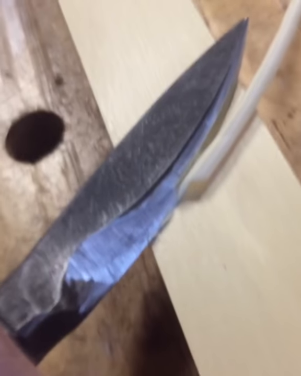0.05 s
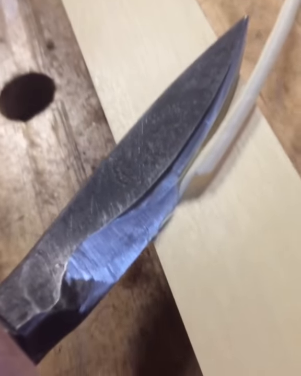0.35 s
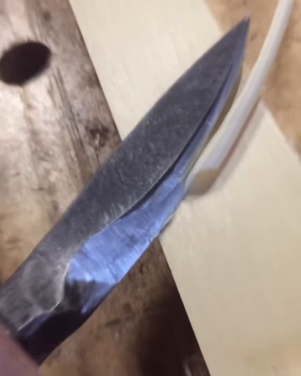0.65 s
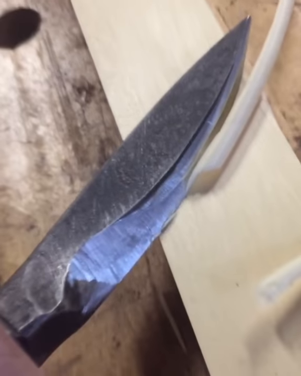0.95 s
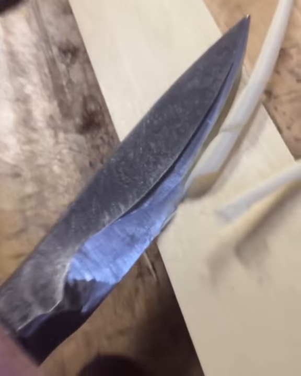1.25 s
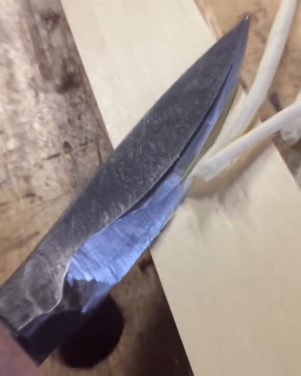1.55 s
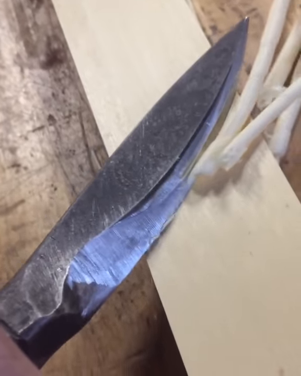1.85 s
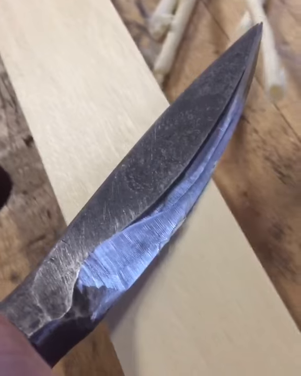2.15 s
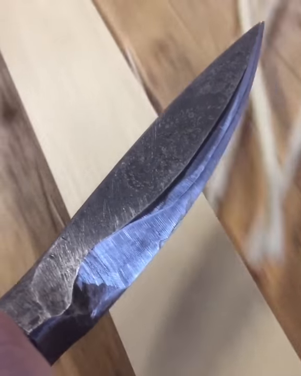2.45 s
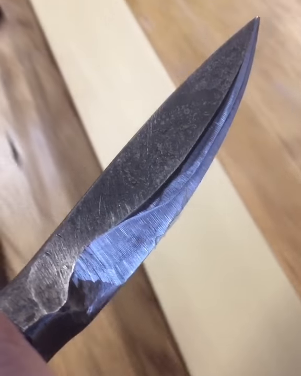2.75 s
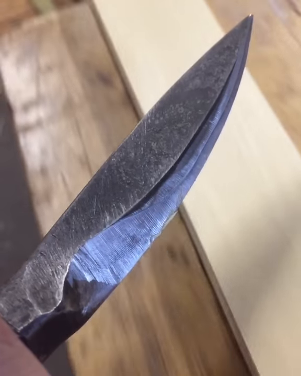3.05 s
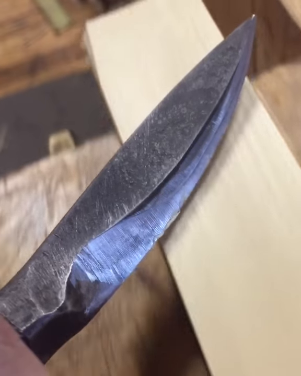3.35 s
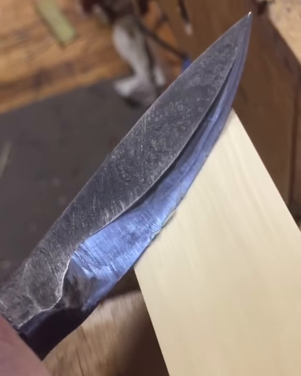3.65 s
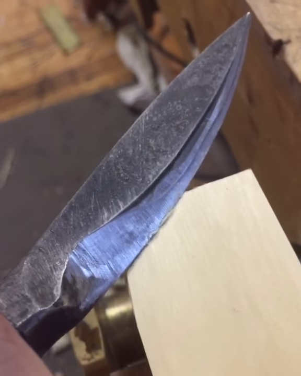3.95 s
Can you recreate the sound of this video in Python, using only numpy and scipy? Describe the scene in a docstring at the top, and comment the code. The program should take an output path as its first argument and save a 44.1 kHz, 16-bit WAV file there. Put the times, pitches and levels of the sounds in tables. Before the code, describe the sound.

From the start a knife slices along a soft wooden board, close up, with a low judder, a hissing scrape and tiny splinter snaps that thicken around 1.5 seconds. At 2 seconds the blade rasps out of the cut. The board is moved with quiet rubbing, soft bumps and two light ticks. At 3.5 seconds it knocks once on the workbench and drags briefly, in a small room.

```python
"""A knife slices one long shaving off a soft board on a workbench, close to the microphone.
From the start the slipping blade judders, parting fibres hiss and ring board and blade, splinters snap.
At two seconds the edge rasps out of the cut. The board is then moved, with friction noise, soft bumps
and two light ticks, and at three and a half seconds it knocks once on the bench in a small room."""
import sys
import numpy as np
from scipy import signal
from scipy.fft import rfft, irfft, next_fast_len
from scipy.io import wavfile
from scipy.ndimage import uniform_filter1d, map_coordinates

SR = 44100
rng = np.random.default_rng(int(sys.argv[2]) if len(sys.argv) > 2 else 0)


def file_out(sig):
    """Save sig as 16-bit WAV at sys.argv[1]."""
    # one column per channel
    cols = np.atleast_2d(sig).T
    # limit, then scale
    lim = np.clip(cols, -1, 1)
    pcm = np.round(lim * 32767).astype(np.int16)
    wavfile.write(sys.argv[1], SR, pcm)


N = 176400

# Course of the stroke. Each row: time in seconds, relative levels in dB of board, blade and hiss.
STROKE = [(0, -62, -76, -60), (.25, -57.5, -76, -58.5), (.33, -62.5, -81, -65), (.45, -56, -92, -61),
          (.7, -61, -91, -66.5), (.88, -51.5, -66.5, -58.5), (1.1, -57, -66.5, -62),
          (1.25, -53, -62, -56.5), (1.38, -49, -59.5, -55.5), (1.48, -47, -57.5, -58.5),
          (1.59, -49, -57, -54), (1.65, -54, -67, -59.5), (1.78, -56, -67, -63.5),
          (1.86, -53.5, -66, -59.5), (1.94, -59.5, -73, -62.5), (2.0, -49, -60, -56.5),
          (2.09, -50, -64, -62), (2.15, -69, -74, -75)]
# Its low sounds. Each row: time in seconds, relative level in dB.
JUDDER_LEVELS = [(0.0, -29), (0.02, -42), (0.66, -45.5), (0.69, -56), (0.74, -44.5), (0.93, -39),
                 (1.09, -48.5), (1.2, -39.5), (1.25, -52), (1.28, -40.5), (1.33, -51), (1.36, -40),
                 (1.53, -41.5), (1.79, -55), (1.96, -43.5), (2.08, -50), (2.11, -46), (2.17, -87)]
RUMBLE_LEVELS = [(0, -46.5), (.22, -51), (.32, -52.5), (.6, -47.5), (.95, -47.5), (1.1, -89), (1.6, -68.5),
                 (1.85, -56), (2.05, -48), (2.15, -70)]
# Driven resonances. Each row: frequency in Hz, bandwidth in Hz, relative level in dB.
JUDDER_MODES = [(97.5, 21, 1.5), (220.5, 38.4, -4), (304.3, 46.6, -15.5)]
BOARD_MODES = [(604.5, 38, -1.5), (657.6, 48, -0.5), (890, 70, -8), (1102.4, 37, 1.5)]
BLADE_MODES = [(3197, 164, 3.5), (3367, 230, -3.5), (4980, 230, -9)]
GRAIN_MODES = [(604, 31, -2.5), (1460, 127, -5), (1595, 59, -6), (2150, 146, -6.5), (2710, 150, -11.5)]
EDGE_MODES = [(4400, 300, -7.5), (5110, 200, -4), (6370, 350, 0.5), (9740, 510, 1)]
RASP_MODES = [(1117, 67, -3), (1680, 110, -11), (3390, 92, -10)]
DRAG_MODES = [(1580, 430, 10), (1970, 430, -3), (3030, 1200, -11)]
# Spectral envelopes. Each row: frequency in Hz, relative level in dB.
HISS_SPECTRUM = [(400, -13), (1300, -35), (2600, -11), (4400, -4.5), (5800, -10.5), (7000, -5),
                 (7700, -11.5), (8600, -0.5), (10000, -8), (10900, -5.5), (11500, -0.5), (14300, -1),
                 (15300, -5.5)]
RUMBLE_SPECTRUM = [(20, -11), (42, -8), (62, -12), (85, -4.5), (200, -46.5)]
AMBIENT_SPECTRUM = [(25, -5), (60, -11.5), (120, -1), (150, -14.5), (192, 3), (250, -10.5), (335, -5),
                    (400, -19.5), (455, -12.5), (790, -19.5), (1250, -16.5), (1800, -21), (6000, -27.5),
                    (15000, -33)]
TEAR_SPECTRUM = [(5000, -35), (9000, -12), (13000, -2), (15000, -7)]
RASP_SPECTRUM = [(150, -20), (350, 3), (700, -1), (1400, -4), (2000, -12), (2500, 0.5), (7000, -5),
                 (12000, 2), (15000, -9.5)]
BRUSH_SPECTRUM = [(1500, -11), (5000, -6.5), (8500, 0.5), (12000, -2), (15000, -1.5)]
SLIDE_SPECTRUM = [(120, -21), (234, -5.5), (441, -4.5), (742, -14.5), (1270, -7), (1910, -20.5),
                  (3090, -19), (4100, -17.5), (5510, -33), (15000, -28.5)]
CLACK_SPECTRUM = [(100, -28), (450, -16.5), (800, 0), (1400, 2), (1900, -5.5), (2350, -27), (3300, -16),
                  (4500, -29), (6000, -21), (8000, -27), (15000, -46)]
# Brief transients. Each row: start in seconds, level in dB, centre frequency in Hz.
SNAPS_AND_TICKS = [(.044, -36.5, 12100), (0.0781, -28.5, 4900), (.203, -35, 11500), (.7235, -43, 12600),
                   (1.3738, -29.5, 13000), (1.534, -30.5, 13200), (1.539, -33, 8900), (1.543, -34.5, 4000),
                   (1.579, -32, 13200), (1.587, -36, 14100), (1.6049, -35.5, 10100), (1.683, -39, 12300),
                   (1.697, -38, 10400), (1.703, -36, 9800), (1.724, -49, 12200), (1.911, -39, 12100),
                   (2.034, -32, 12000), (3.074, -49.5, 2620), (3.173, -48.5, 1690)]  # the last two rows are ticks of the moved board
CATCHES = [(.205, -28.5, 57), (0.214, -38.5, 254), (1.276, -38.5, 208), (1.436, -35, 207),
           (1.906, -47, 203), (2.104, -37, 168)]
# Jolts of the board. Each row: start in seconds, level in dB, centre in Hz, 60 dB decay time in seconds.
BUMPS = [(1.543, -38, 1700, .03), (2.26, -47, 290, 0.11), (3.172, -39, 800, 0.055), (3.175, -48, 350, 0.19),
         (3.24, -52, 940, 0.23), (3.399, -44.5, 910, 0.034), (3.465, -46.5, 645, 0.053),
         (3.467, -39, 293, 0.083), (3.496, -34.5, 1140, 0.01), (3.932, -51, 684, 0.047),
         (3.934, -36.5, 208, 0.061)]
# Tearing and rubbing. Each row: start, attack, hold and release in seconds, level in dB.
TEAR_SWELL = (1.44, -0.08, 0.39, 0.16, -56.5)  # the negative attack gives an abrupt onset
RASP_SWELL = (2.002, .025, .035, .085)  # times only
BRUSH_SWELLS = [(2.071, 0.039, 0.009, 0.022, -53), (2.1, 0.022, 0.021, 0.13, -58.5),
                (2.122, .03, 0.11, 0.53, -69), (3.482, 0.019, .2, 0.32, -71.5),
                (3.73, 0.023, 0.0046, .015, -72)]
SLIDE_SWELLS = [(2.115, 0.029, 0.4, 0.12, -63.5), (3.015, 0.12, 0.17, 0.54, -65)]
DRAG_SWELL = (3.5, 0.1, 0.67, -0.55, -66)  # the negative release cuts the hold short
# Contacts of the knock. Each row: start in seconds, level in dB, cutoff in Hz, relative thump in dB.
CONTACTS = [(3.5079, -12, 3120, -17.5), (3.5116, -16, 1540, -3.5), (3.5131, -29, 4940, 3.5),
            (3.5188, -28, 800, -0.5)]
# Free vibrations. Each row: frequency in Hz, relative level in dB, 60 dB decay time in seconds.
STRUCK_MODES = [(634, -18, 0.078), (681, -18.5, 0.16), (800, -33, 0.045), (1086, -21.5, 0.061),
                (1480, -17.5, 0.04), (1953, -28, 0.065), (2900, -31, 0.034), (3285, -27.5, 0.02)]
BENCH_MODES = [(92, -6, 0.048), (174, -19, 0.13), (250, -5, 0.036)]
# Decay of the room. Each row: frequency in Hz, reverberation time in seconds.
ROOM_T60 = [(100, 0.41), (500, 0.41), (1600, 0.17), (4000, 0.24), (12000, 0.21)]

RISE_PER_S, SAG_PER_S, MID_CUT_S = .035, .07, 1.25  # fractional pitch drift, about mid-stroke
FIBRES_PER_S, SLIPS_PER_S, CRACKLES_PER_S, CLUMPS_PER_S = 9000, 500, 1000, 90
JUDDER_GROWS_DB_PER_S, RING_GROWS_DB_PER_S, GRAIN_FADE_DB_PER_S = 5.5, 4.5, 6
GRIP_DB = 1.3  # level swing as the edge's grip varies


def amp(db):
    """Amplitude ratio of a level in decibels."""
    return 10 ** (np.asarray(db) / 20)


def unit(x):
    """Normalisation to rms 1."""
    return x / np.sqrt(np.mean(x ** 2) + 1e-20)


def clock():
    """Sample times in seconds."""
    return np.arange(N) / SR


def along(points, hz):
    """Interpolation on a logarithmic frequency axis."""
    f, values = np.transpose(points)
    return np.interp(np.log(hz + 1), np.log(f + 1), values)


def levels(rows):
    """One envelope per dB column, decaying exponentially after the last row."""
    times, *columns = np.transpose(rows)
    fade_db = 69 * np.maximum(clock() - times[-1], 0)
    return [amp(np.interp(clock(), times, db) - fade_db) for db in columns]


def swell(start, attack, hold, release, db):
    """A trapezoidal amplitude envelope."""
    return amp(db) * np.interp(clock(), start + np.cumsum([0, attack, hold, release]), [0, 1, 1, 0])


def wobble(per_s):
    """Smooth random modulation."""
    return map_coordinates(rng.standard_normal(int(N * per_s / SR) + 4), [clock() * per_s])


def filtered(x, response):
    """Linear filtering: the spectrum times a frequency response."""
    size = next_fast_len(len(x) + SR // 4)
    return irfft(rfft(x, size) * response(np.fft.rfftfreq(size, 1 / SR)), size)[:len(x)]


def coloured(x, spectrum):
    """Spectral shaping, at rms 1."""
    return unit(filtered(x, lambda f: amp(along(spectrum, f))))


def ring(x, modes, drift=0):
    """Forced resonance at rms 1; resampling makes the pitch drift."""
    def band(f, hz, width):
        return 1j * f * width / (hz * hz - f * f + 1j * f * width)
    y = filtered(x, lambda f: sum(amp(db) * band(f, hz, w) * band(f, hz, 4 * w) for hz, w, db in modes))
    speed = 1 + drift * (clock() - MID_CUT_S)
    return unit(map_coordinates(y, [np.cumsum(speed)], mode="wrap"))


def minimum_phase(gain):
    """The most compact causal impulse response with this gain."""
    cepstrum = irfft(np.log(np.maximum(gain, 1e-6)))
    cepstrum[1:len(cepstrum) // 2] *= 2
    cepstrum[len(cepstrum) // 2 + 1:] = 0
    return irfft(np.exp(rfft(cepstrum)))


def burst(hz, octaves, t60):
    """An exponentially damped band of noise."""
    t = np.arange(SR // 6) / SR
    white = rng.standard_normal(len(t))
    noise = filtered(white, lambda f: 1 / (1 + np.abs(np.log2((f + 1) / hz) / octaves) ** 3))
    decay = amp(-60 * t / t60)
    return unit(noise * decay) * np.sqrt(np.mean(decay ** 2)) / 2


def add(track, start, x):
    """Superposition of x from a start in seconds."""
    i = int(start * SR)
    track[i:i + len(x)] += x[:N - i]


def fractures(spread_db, per_s=FIBRES_PER_S):
    """Independent tiny breaks form a Poisson train of impulses with log-normal sizes."""
    impulses = (rng.random(N) < per_s / SR) * rng.choice([-1, 1], N)
    return unit(impulses * amp(spread_db * rng.standard_normal(N)))


def crackle():
    """Fibres give way in clumps, modulating an impulse train in amplitude."""
    return unit(fractures(0, CRACKLES_PER_S) * amp(4 * wobble(CLUMPS_PER_S)))


def woody(x, t60=.028):
    """The board's dense high modes overlap, so their impulse response is decaying noise."""
    t = np.arange(SR // 30) / SR
    modes = rng.standard_normal(len(t)) * amp(-60 * t / t60)
    return unit(unit(x) + amp(2.5) * unit(signal.fftconvolve(x, modes)[:N]))


def patchy(x, depth_db=1.5):
    """Uneven grain modulates the spectrum in time and frequency."""
    spectra = signal.stft(x, nperseg=512)[2]
    field = uniform_filter1d(rng.standard_normal(spectra.shape), size=5, axis=0)
    field = uniform_filter1d(field, size=24, axis=1)
    return unit(signal.istft(spectra * amp(depth_db * unit(field)), nperseg=512)[1][:N])


def judder(grip):
    """Stick-slip of the edge drives low resonances; the upper ones gain along the stroke."""
    force, = levels(JUDDER_LEVELS)
    slips = fractures(1.5, SLIPS_PER_S)
    share = amp(JUDDER_MODES[1][2] + JUDDER_GROWS_DB_PER_S * (clock() - MID_CUT_S))
    shaking = ring(slips, JUDDER_MODES[:1], RISE_PER_S) + share * ring(slips, JUDDER_MODES[1:])
    return force * amp(-1 + GRIP_DB * grip) * shaking / np.hypot(1, share)


def board_ring(push, grip):
    """Parting fibres force the board's modes; the highest rises and takes a growing share of power."""
    body = ring(fractures(spread_db=9), BOARD_MODES[:-1])
    stutter = amp(2 * wobble(70))
    tone = unit(stutter * ring(fractures(spread_db=5.5), BOARD_MODES[-1:], RISE_PER_S))
    share = amp(BOARD_MODES[-1][2] + RING_GROWS_DB_PER_S * (clock() - MID_CUT_S))
    return push * amp(-4 + GRIP_DB * grip) * (body + share * tone) / np.hypot(1, share)


def blade_ring(bite, grip):
    """Fractures force the blade's high resonances, which rise slightly."""
    breaks = woody(fractures(spread_db=5.5))
    return bite * amp(-1.5 + GRIP_DB * grip) * ring(breaks, BLADE_MODES, .6 * RISE_PER_S)


def grain_scrape(push, grip):
    """Scraping excites sagging resonances of the grain and steady ones of the thin edge."""
    t = clock()
    scrape = fractures(spread_db=7) + crackle()
    ringing = ring(scrape, GRAIN_MODES, -SAG_PER_S) + amp(-3.5) * ring(scrape, EDGE_MODES)
    envelope = (t < STROKE[-1][0]) * (push / push.max()) ** .29  # loosely follows the board
    return envelope * amp(-58 + GRIP_DB * grip - GRAIN_FADE_DB_PER_S * t) * patchy(ringing)


def fibre_hiss(parting, grip):
    """Thousands of fractures a second merge into broadband shot noise."""
    breaks = amp(1.5 * wobble(250)) * woody(fractures(spread_db=2)) + amp(-3) * crackle()
    flicker_db = grip + 1.2 * wobble(45.46)
    return parting * amp(-1 + flicker_db) * patchy(coloured(breaks, HISS_SPECTRUM))


def rumble():
    """Low-frequency noise swells and fades with the stroke."""
    envelope, = levels(RUMBLE_LEVELS)
    return envelope * amp(-4) * coloured(rng.standard_normal(N), RUMBLE_SPECTRUM)


def ambience():
    """Stationary noise forms the room's quiet background."""
    return amp(-65) * coloured(rng.standard_normal(N), AMBIENT_SPECTRUM)


def snaps_and_ticks(t60=.0084, width_hz=5400, scatter_s=.0078):
    """Splinters snap by brittle fracture during the cut; later the moved board gives two light ticks."""
    out = np.zeros(N)
    for start, db, hz in SNAPS_AND_TICKS:
        octaves = min(.65, width_hz / hz)
        add(out, start, amp(db) * burst(hz, octaves, t60))
        for lag in rng.uniform(-scatter_s, scatter_s, size=2):  # two weaker bursts close by
            add(out, start + lag, amp(db - 10.5) * burst(hz, octaves, t60))
    return out


def reverberation(x):
    """Diffuse reflections arrive after 5 ms and decay at a rate set by frequency."""
    hz, t, spectra = signal.stft(rng.standard_normal(SR // 2), SR, nperseg=256)
    decay = amp(-60 * t / along(ROOM_T60, hz)[:, None])
    tail = signal.istft(spectra * decay, SR, nperseg=256)[1]
    return signal.fftconvolve(x, np.pad(tail, (SR // 200, 0)) / np.linalg.norm(tail))[:N]


def thuds(rows, attack_s=.00099):
    """A jolt gives the board a damped response that builds quickly and dies away."""
    out = np.zeros(N)
    for start, db, hz, t60 in rows:
        jolt = burst(hz, octaves=.38, t60=t60)
        onset = 1 - np.exp(-np.arange(len(jolt)) / SR / attack_s)
        add(out, start, amp(db) * jolt * onset)
    return out


def catches(t60=.091):
    """The edge catches in the grain, exciting low transients."""
    return thuds([(*row, t60) for row in CATCHES])


def tear():
    """The shaving tears in clumps of impulses, strongest in the high treble."""
    return swell(*TEAR_SWELL) * coloured(crackle(), TEAR_SPECTRUM)


def rasp():
    """As the edge leaves the cut, one train of fractures drives both noise and resonances."""
    breaks = fractures(spread_db=6)
    noise = swell(*RASP_SWELL, db=-48) * coloured(woody(breaks), RASP_SPECTRUM)
    return noise + swell(*RASP_SWELL, db=-54) * ring(breaks, RASP_MODES)


def brushing():
    """Light friction of shaving and hand on the wood gives bright noise."""
    envelope = sum(swell(*row) for row in BRUSH_SWELLS)
    return envelope * coloured(woody(fractures(spread_db=5.5)), BRUSH_SPECTRUM)


def sliding():
    """Sliding friction of the board gives dull, uneven noise."""
    envelope = sum(swell(*row) for row in SLIDE_SWELLS) * amp(wobble(24.66))
    return envelope * coloured(woody(fractures(spread_db=4.5)), SLIDE_SPECTRUM)


def drag():
    """Friction drives broad resonances as the board is briefly drawn along."""
    envelope = swell(*DRAG_SWELL) * amp(2.9 * wobble(25.25))
    return envelope * ring(woody(rng.standard_normal(N)), DRAG_MODES)


def knock():
    """Each contact clacks and sets board and bench in free vibration; softer contact is duller."""
    out, t = np.zeros(N), np.arange(SR // 2) / SR
    f = np.fft.rfftfreq(len(t), 1 / SR)
    clack = minimum_phase(amp(along(CLACK_SPECTRUM, f)))
    clack /= np.abs(clack).max()
    onset = 1 - np.exp(-t / .001)

    def vibration(modes):
        return sum(amp(db + rng.normal(0, 1) - 60 * t / t60) * np.sin(2 * np.pi * hz * t)
                   for hz, db, t60 in modes)
    for start, db, cutoff_hz, thump_db in CONTACTS:
        blow = clack + vibration(STRUCK_MODES) + amp(thump_db) * vibration(BENCH_MODES) * onset
        lowpass = minimum_phase(1 / np.hypot(1, (f / cutoff_hz) ** 2))
        add(out, start, amp(db) * signal.fftconvolve(blow, lowpass)[:len(t)])
    return out


def scene():
    """The sources superpose; only the brief transients are given reverberation."""
    hits = knock() + snaps_and_ticks() + thuds(BUMPS) + catches()
    push, bite, parting = levels(STROKE)
    grip = wobble(29.85)  # shared, so the cutting sounds flutter together
    ringing = judder(grip) + board_ring(push, grip) + blade_ring(bite, grip)
    cutting = grain_scrape(push, grip) + fibre_hiss(parting, grip) + tear() + rumble()
    rubbing = rasp() + sliding() + brushing() + drag()
    return (ringing + cutting + rubbing + hits + amp(-14.5) * reverberation(hits) + ambience())[None]


def record(dry, low_cut_hz=42, top_hz=15450):
    """Band limiting: the microphone drops the deepest bass, and the highest treble is removed."""
    x = signal.sosfilt(signal.butter(4, low_cut_hz, "high", fs=SR, output="sos"), dry[0])
    return filtered(x, lambda hz: hz < top_hz)[None]


dry = scene()
out = record(dry)
file_out(out)
```